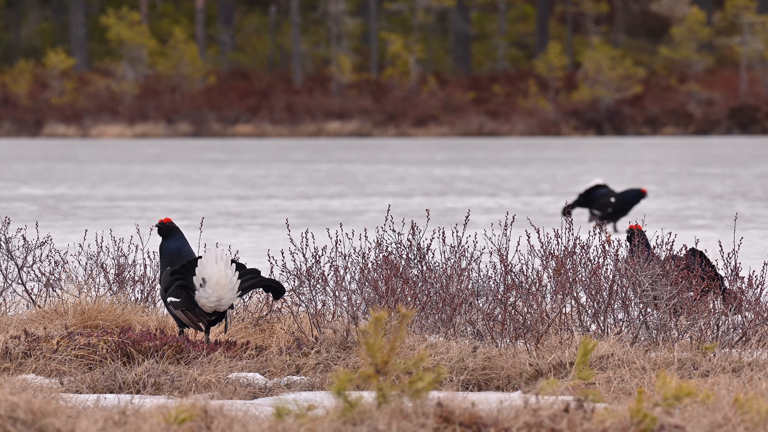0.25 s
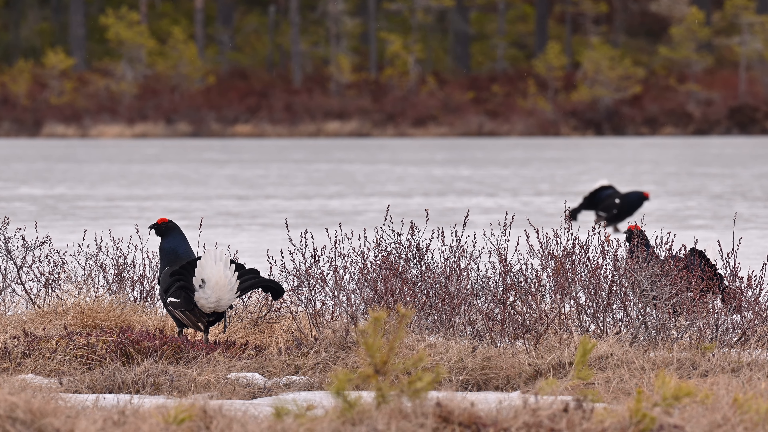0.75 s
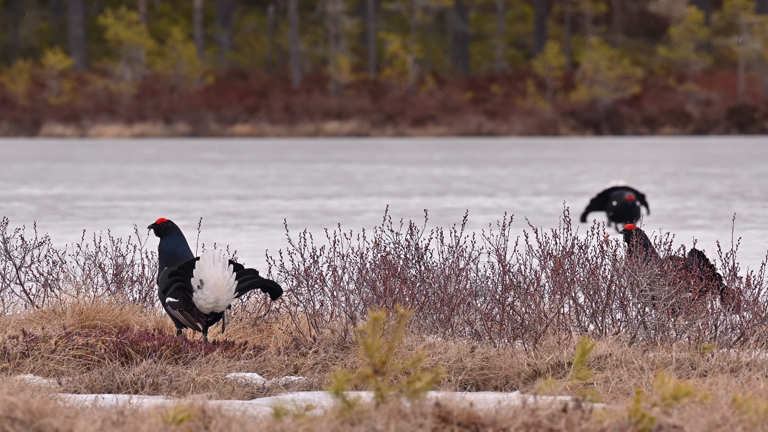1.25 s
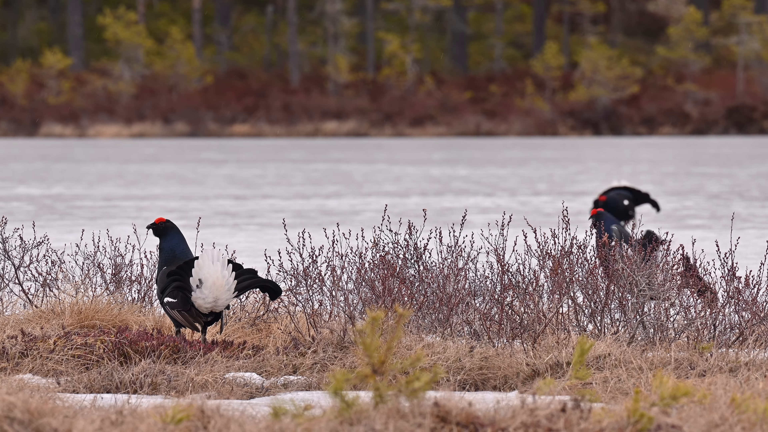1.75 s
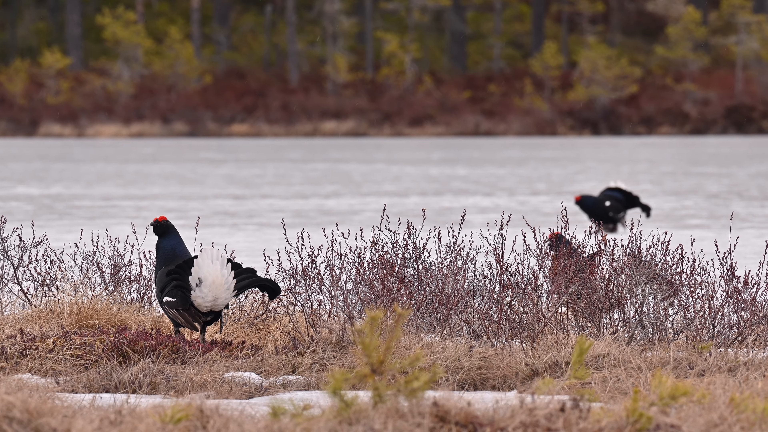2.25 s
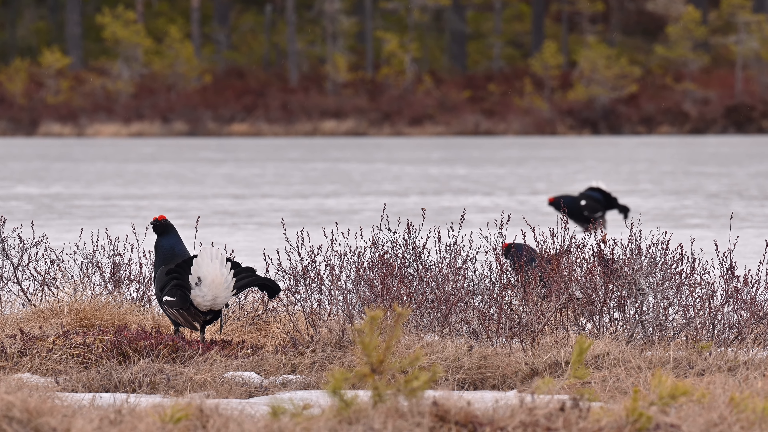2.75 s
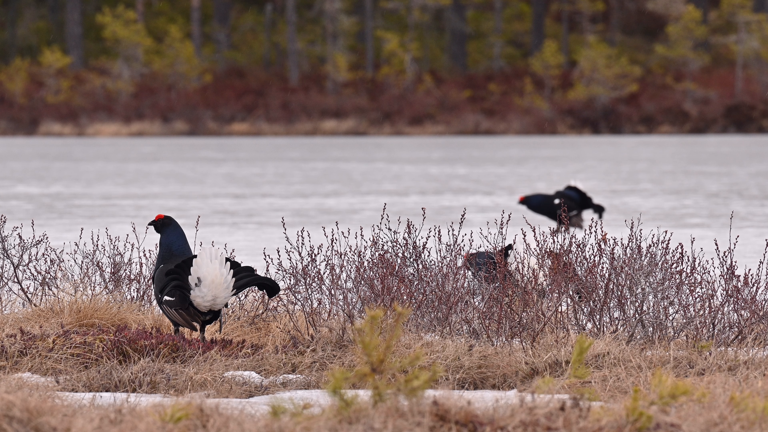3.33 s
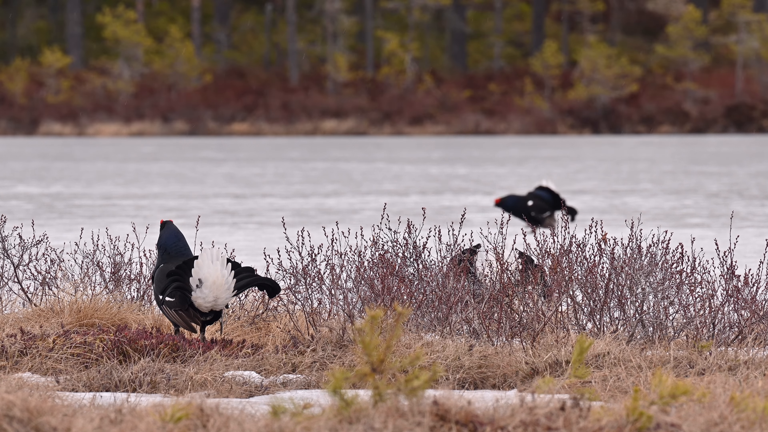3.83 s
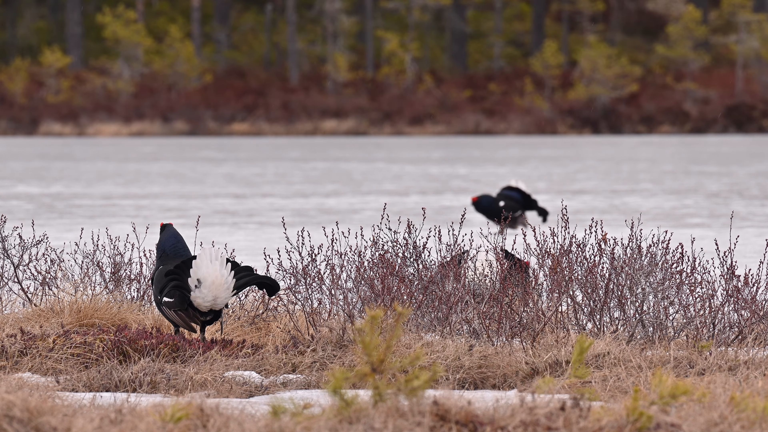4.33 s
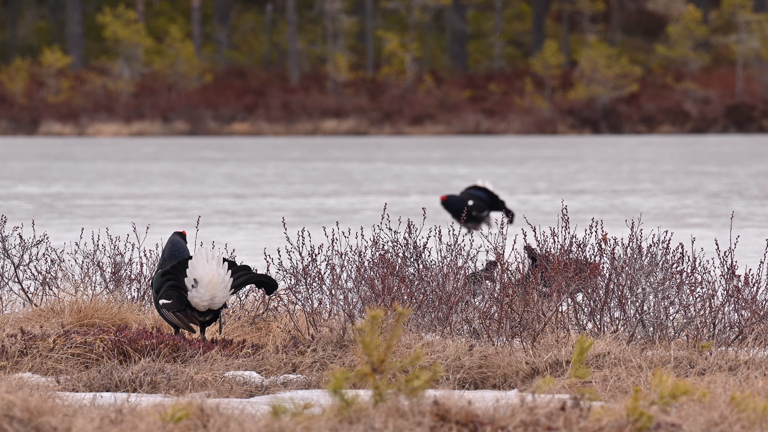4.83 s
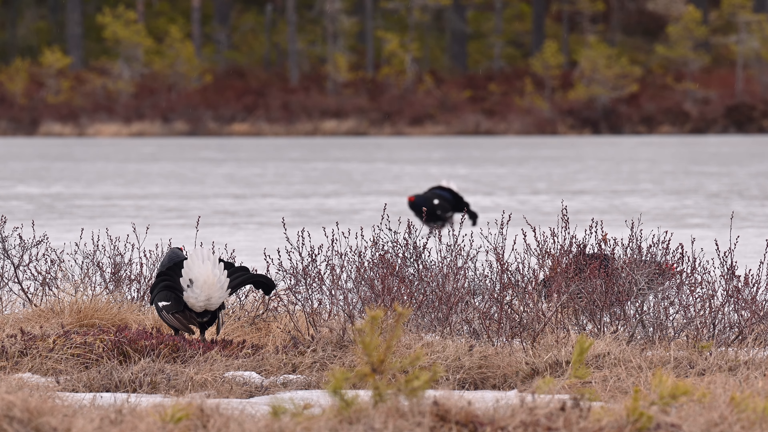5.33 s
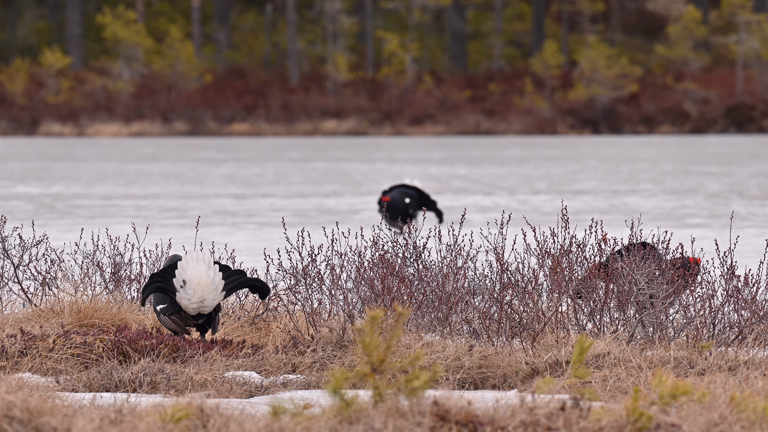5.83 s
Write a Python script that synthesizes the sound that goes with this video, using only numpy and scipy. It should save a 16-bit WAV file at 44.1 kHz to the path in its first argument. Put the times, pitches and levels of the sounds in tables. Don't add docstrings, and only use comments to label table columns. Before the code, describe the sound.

Black grouse cocks bubble in rolling, hollow coos on an open bog, with a brief opening hiss, a softer later hiss and faint distant bird whistles.

```python
import sys
import numpy as np
from scipy import signal
from scipy.fft import rfft, irfft
from scipy.io import wavfile

SR = 44100
rng = np.random.default_rng(int(sys.argv[2]) if len(sys.argv) > 2 else 0)


def to_wav(s):
    ch = np.atleast_2d(s).T
    pcm = np.round(np.clip(ch, -1, 1) * 32767)
    wavfile.write(sys.argv[1], SR, pcm.astype(np.int16))


def decibels_to_gain(level_db):
    exponent = np.asarray(level_db, float) / 20
    return 10 ** exponent


N = 267290

# frequency in Hz, density in dB per Hz.
AIR_SPECTRUM = [(15, -49), (25, -30.5), (165, 0), (333, 7), (424, 2.5), (707, 7.5), (1210, -4.5),
                (1310, -7), (2380, -4.5), (2950, -6.5), (3200, -8), (14100, -10), (15700, -12)]
AIR_DB = -68
# time in seconds, level in dB.
BREEZE_LEVEL = [(0, -78), (1.5, -73), (2.998, -75), (5.001, -72), (6.06, -67.5)]

# time in seconds, breath level in dB, windpipe and mouth resonances in Hz.
HISS_TRACKS = [
    [(0, -47.5, 2173, 5553), (.12, -49.5, 2190, 6000), (.15, -50, 2202, 7530), (.245, -52.5, 2150, 5860),
     (.265, -56, 1950, 5430), (.285, -60, 1850, 5530), (.31, -92, 1800, 5600)],
    [(1.79, -90, 1900, 6890), (1.82, -61.5, 2050, 6860), (1.85, -51.5, 2100, 6600), (1.89, -52, 2050, 7070),
     (1.92, -61, 1846, 6600), (2.03, -61, 1700, 5110), (2.15, -58, 1710, 5620), (2.36, -63.5, 2200, 3980),
     (2.41, -82, 2200, 3880)],
]
# frequency in Hz, density in dB per Hz.
BREATH_SPECTRA = [
    [(1400, -41), (1750, -3.5), (2650, 0.5), (3200, -13.5), (5500, -8), (6400, -8.5), (7600, -6),
     (8300, -10), (12000, -16.5), (15500, -26)],
    [(1200, -11), (1450, 3), (2500, 7), (3300, -4.5), (3800, -2.5), (5800, -8), (6400, -12), (7000, -10.5),
     (8200, -16.5), (11000, -30.5)],
]
# upper band in dB, fade in dB, fade time in seconds.
BILL_CLOSING = [
    (-2, 26.5, 0.034),
    (-2.5, 27.5, 0.076),
]
BAND_SPLIT_HZ = 4000
PIPE_WIDTH_HZ, PIPE_DB = 480, 2
MOUTH_WIDTH_HZ, MOUTH_DB = 1000, -3

NEAR_ECHO_S, NEAR_ECHO_DB = 0.1, -17
FOREST_T60_S, FOREST_DB, FOREST_BASS_DB = 3.4, -25, -36
FOREST_LOW_HZ, FOREST_CUT_HZ = 1110, 1570

SAC_HZ, SAC_WIDTH_HZ = 525.5, 97.4
RISE_S, FALL_S = 0.0074, 0.0041
PLUNGE_HZ, PLUNGE_S = 142, 0.004
SCOOP_HZ, SCOOP_S, STEEP_HZ = 88, 0.0061, 105
SWELL_DB, SWELL_FROM_HZ, SWELL_SPAN_HZ = 7.5, 518, 100
# length in seconds, start, middle and end pitch in Hz, level in dB.
ROLL_NOTES = [
    (.055, 454, 371, 360, -38),
    (.057, 490, 410, 409, -37.5),
    (.06, 527.7, 440, 404, -36),
    (.062, 551, 458, 408, -34),
    (.054, 580, 491, 430, -32),
    (.044, 526.3, 582, 470, -26.5),
    (.054, 550, 615, 442, -26.5),
    (.034, 615, 602, 490, -29),
]
ROLL_MARKS = (-3, 0, 6, 8, 9, 10, 11, 12)
PULSE_S = 0.068
# first and last note in seconds, gain in dB, pitch ratio.
WHOLE_ROLLS = [
    (0.469, 1.279, -0.4, 1.004),
    (2.932, 3.744, 0.34, 1.005),
    (3.619, 4.430, 4, 1.02),
]
# first and last note in seconds, first and last step, gain in dB.
BROKEN_ROLLS = [(.008, .211, 0, 2.5, -2), (1.551, 1.551, 1, 0, 8.5), (2.759, 2.895, -3.5, -3, 3.5),
                (2.859, 2.858, -2, 0, -1.5), (3.137, 3.207, 0.5, 1.5, 9.5), (3.346, 3.346, 0, -10, 5.5),
                (3.983, 3.983, 0, 4.5, 5), (5.325, 5.325, 0, 0.5, 5), (5.435, 5.706, 0, 5, 1.5),
                (5.746, 5.746, 8, 6, 6.5), (5.841, 5.981, 8.5, 8, 1), (5.959, 5.959, 9.5, 8.5, 0),
                (6.051, 6.051, 10, 9.5, 6)]
# first and last note in seconds, first and last step, gain in dB.
HIGH_ROLLS = [
    (4.409, 4.892, -0.5, 5, 3.5),
    (4.957, 5.228, 7, 8.5, 3),
    (5.298, 5.498, 8.5, 9.2, 4),
    (5.567, 5.705, 11, 11.3, 8.5),
    (5.768, 5.768, 11.7, 11.7, 7.5),
]
HIGH_RATIO = 1.045
# time into the verse and length in seconds, middle pitch and glide in Hz, level in dB.
VERSE_NOTES = [(0, .032, 616, -224, -36.5), (0.057, .07, 594.5, 23, -27), (0.193, .026, 606, -18.5, -25.5),
               (.3, .029, 508.3, 223, -31), (.329, .037, 565.5, -136, -27), (.391, .049, 503, -8, -29.5),
               (.461, .05, 552.3, 223.5, -29.5), (.503, .083, 590.6, 28.5, -32.5),
               (0.587, .026, 571, -130, -26), (.658, 0.027, 561, -117, -44), (0.702, .023, 532, -108, -35),
               (0.73, .04, 502.7, -30, -33.5), (0.78, .025, 560, 312.5, -28.5),
               (.808, .032, 577.5, -254, -27.5), (0.876, 0.019, 616, -124, -24.5),
               (.952, .054, 585, -9, -26), (1.027, 0.053, 566, 89, -26), (1.087, 0.02, 669, 116, -32),
               (1.109, 0.033, 564.6, -185, -26.5)]
# start in seconds, gain in dB, pitch ratio, time stretch.
VERSE_STARTS = [
    (1.497, 0, 1, 1),
    (3.978, .3, 1, 1),
    (4.619, 1.5, .99, 1.008),
]
# start and length in seconds, middle pitch and glide in Hz, level in dB.
LOOSE_NOTES = [(.278, 0.03, 463, -76, -38), (1.178, 0.011, 483, -60, -27.5), (3.652, 0.039, 428, 38.5, -30),
               (5.809, 0.017, 565, -170, -41.5), (6.028, 0.0309, 631, -100, -34),
               (1.492, 0.05, 398.4, 110, -34), (2.712, 0.037, 393, 81.5, -33),
               (2.799, 0.033, 510, -280, -34), (3.303, 0.023, 395, -25, -30),
               (3.937, 0.028, 467, -1.5, -32.5), (4.386, 0.014, 533, -93, -20)]
ARCH_HZ, ARCH_LOSS = 55, 0.24
HELD_S, HELD_ARCH_HZ = 0.076, 5

# start and length in seconds, start and end pitch in Hz, level in dB.
WHISTLES = [(2.49, .022, 2400, 2280, -71), (2.508, .025, 2368, 1920, -64), (2.53, .04, 1950, 1850, -74),
            (2.62, 0.068, 1990, 2330, -68.5), (2.884, 0.062, 2430, 2426, -69.5),
            (2.968, .034, 3020, 2320, -66.5), (3.055, 0.13, 2900, 2475, -69.5),
            (4.169, 0.071, 2888, 2950, -77), (4.24, 0.052, 2980, 3230, -77), (4.25, .11, 4830, 4430, -81.5),
            (4.69, .045, 2881, 2325, -69), (4.735, .047, 2330, 2726, -68), (4.78, 0.072, 2660, 2540, -64),
            (4.89, .04, 2820, 2660, -79.5), (4.985, 0.043, 2330, 2120, -69.5),
            (5.03, .04, 2276, 2140, -67.5), (5.07, .05, 2180, 2296, -71.5), (5.16, .05, 2680, 3002, -70),
            (5.377, .038, 3400, 4630, -74.5), (5.422, .03, 3320, 3580, -67.5),
            (5.45, .024, 3640, 2850, -70.5), (3.577, .032, 3400, 4970, -70), (3.607, .026, 4900, 4560, -83),
            (5.66, 0.035, 3280, 3129, -79.5)]
# start in seconds, start and end pitch in Hz, level in dB.
CHIPS = [(3.006, 2250, 2900, -65), (3.196, 2170, 1820, -71), (5.409, 2850, 3380, -70),
         (4.384, 4950, 3550, -73), (4.499, 4950, 3605, -74.5), (4.862, 4870, 3940, -74.5),
         (4.872, 2400, 3050, -63.5), (5.077, 3400, 3950, -63), (5.105, 2280, 2850, -67.5),
         (5.13, 2800, 2790, -66), (5.166, 3150, 3990, -67.5), (5.206, 2950, 2324, -65.5),
         (5.265, 3300, 3834, -64.5), (5.288, 2820, 2845, -70.5), (5.404, 3400, 4580, -67.5),
         (5.424, 4600, 4640, -73.5)]
CHIP_S = 0.016
WHISTLE_ECHO_S, WHISTLE_ECHO_DB = 0.3, -5

# time in seconds, thud in dB, crackle over thud in dB.
FOOTFALLS = [
    (3.369, -58.5, 1.5),
    (3.471, -56.5, -3),
    (3.861, -59.5, -8.5),
    (5.733, -76, -6.5),
]


def rms_one(x):
    return x / np.sqrt(np.mean(x ** 2) + 1e-20)


def band(x, low_hz, high_hz, order=2):
    return signal.sosfilt(signal.butter(order, [low_hz, high_hz], "band", fs=SR, output="sos"), x)


def coloured_noise(spectrum):
    hz = np.maximum(np.arange(N // 2 + 1) * SR / N, 1)
    points_hz, points_db = np.transpose(spectrum)
    density_db = np.interp(np.log(hz), np.log(points_hz), points_db)
    return rms_one(irfft(rfft(rng.standard_normal(N)) * decibels_to_gain(density_db), N))


def noise_on(centre_hz, width_hz):
    lowpass = signal.butter(2, width_hz / 2, fs=SR, output="sos")
    narrow = signal.sosfilt(lowpass, rng.standard_normal((2, N)))
    phase = 2 * np.pi * np.cumsum(centre_hz) / SR
    return rms_one(narrow[0] * np.cos(phase) + narrow[1] * np.sin(phase))


def resonance(x, hz, width_hz):
    r = np.exp(-np.pi * width_hz / SR)
    poles = [1, -2 * r * np.cos(2 * np.pi * hz / SR), r * r]
    return signal.lfilter([(1 - r * r) / 2, 0, (r * r - 1) / 2], poles, x)


def glides(notes, rise_s, fall_s, plunge_hz, swell_db, scoop_hz=0):
    out = np.zeros(N + SR)
    for (start, length, begin_hz, middle_hz, end_hz, db), turn in zip(notes, rng.random(len(notes))):
        t = np.arange(round(length * SR)) / SR
        u = t / length
        hz = begin_hz * (1 - u) * (1 - 2 * u) + 4 * middle_hz * u * (1 - u) + end_hz * u * (2 * u - 1)
        hz = hz - plunge_hz * np.exp((t - length) / PLUNGE_S)
        if abs(end_hz - begin_hz) < STEEP_HZ:
            hz = hz - scoop_hz * np.exp(-t / SCOOP_S)
        ramp = np.clip(np.minimum(t / rise_s, (length - t) / fall_s), 0, 1)
        edge = np.sin(np.pi / 2 * ramp) ** 2
        strain = np.clip((middle_hz - SWELL_FROM_HZ) / SWELL_SPAN_HZ, 0, 1)
        level = decibels_to_gain(db + swell_db * strain * (u - 1))
        first = max(round(start * SR), 0)
        out[first:first + len(t)] += level * edge * np.sin(2 * np.pi * (turn + np.cumsum(hz) / SR))
    return out[:N]


def background():
    s, db = np.transpose(BREEZE_LEVEL)
    breeze_gain = decibels_to_gain(np.interp(np.arange(N) / SR, s, db) + 1)
    breeze = breeze_gain * rms_one(band(rng.standard_normal(N), 90, 360))
    far_lek = decibels_to_gain(-76.5) * rms_one(band(rng.standard_normal(N), 743, 800))
    return decibels_to_gain(AIR_DB) * coloured_noise(AIR_SPECTRUM) + breeze + far_lek


def hisses():
    out, t = np.zeros(N), np.arange(N) / SR
    for track, spectrum, (upper_db, fade_db, fade_s) in zip(HISS_TRACKS, BREATH_SPECTRA, BILL_CLOSING):
        s, *columns = np.transpose(track)
        low_db, pipe_hz, mouth_hz = (np.interp(t, s, column) for column in columns)
        high_db = low_db + upper_db - fade_db * np.exp(np.minimum(t - s[-1], 0) / fade_s)
        breath = coloured_noise(spectrum)
        low = rms_one(band(breath, 900, BAND_SPLIT_HZ, order=4))
        high = rms_one(band(breath, BAND_SPLIT_HZ, 16000, order=4))
        low = rms_one(low + decibels_to_gain(PIPE_DB) * noise_on(pipe_hz, PIPE_WIDTH_HZ))
        high = rms_one(high + decibels_to_gain(MOUTH_DB) * noise_on(mouth_hz, MOUTH_WIDTH_HZ))
        ragged = decibels_to_gain(0.85 * rms_one(band(rng.standard_normal(N), 3.7, 27)))
        sounding = (t >= s[0]) * (t < s[-1])
        out += sounding * ragged * (decibels_to_gain(low_db) * low + decibels_to_gain(high_db) * high)
    return out


def echoes(x):
    t = np.arange(2 * SR) / SR
    near, far = rng.standard_normal((2, 2 * SR))
    near = near * decibels_to_gain(-60 * t / NEAR_ECHO_S) * (t > 0.004)
    far = far * decibels_to_gain(-60 * t / FOREST_T60_S) * np.clip(t / 1.1, 0, 1)
    mids = band(far, FOREST_LOW_HZ, FOREST_CUT_HZ)
    bass = band(far, 210, 800)
    tail = np.zeros(2 * SR)
    for db, part in ((NEAR_ECHO_DB, near), (FOREST_DB, mids), (FOREST_BASS_DB, bass)):
        tail += decibels_to_gain(db) * part / np.linalg.norm(part)
    return signal.fftconvolve(x, tail)[:N]


def roll_notes():
    rolls = [(start, end, 0, 12, db, ratio) for start, end, db, ratio in WHOLE_ROLLS]
    rolls += [(*roll, 1) for roll in BROKEN_ROLLS]
    rolls += [(*roll, HIGH_RATIO) for roll in HIGH_ROLLS]
    notes = []
    for start, end, first, last, gain_db, ratio in rolls:
        count = round((end - start) / PULSE_S) + 1
        for s, step in zip(np.linspace(start, end, count), np.linspace(first, last, count)):
            length, *hz, db = (np.interp(step, ROLL_MARKS, column) for column in np.transpose(ROLL_NOTES))
            notes.append((s, length, *(ratio * np.array(hz)), db + gain_db))
    return notes


def arched_notes():
    rows = []
    for start, gain_db, ratio, stretch in VERSE_STARTS:
        for s, length, hz, glide_hz, db in VERSE_NOTES:
            rows.append((start + stretch * s, length, ratio * hz, glide_hz, db + gain_db))
    notes = []
    for s, length, hz, glide_hz, db in rows + LOOSE_NOTES:
        droop_hz = ARCH_HZ - ARCH_LOSS * abs(glide_hz) if length < HELD_S else HELD_ARCH_HZ
        ends_hz = hz - droop_hz
        notes.append((s, length, ends_hz - glide_hz / 2, hz, ends_hz + glide_hz / 2, db))
    return notes


def bubbling():
    rolls = glides(roll_notes(), RISE_S, FALL_S, PLUNGE_HZ, SWELL_DB)
    verses = glides(arched_notes(), RISE_S, FALL_S, PLUNGE_HZ, SWELL_DB, SCOOP_HZ)
    return resonance(rolls + verses, SAC_HZ, SAC_WIDTH_HZ)


def song_notes():
    rows = WHISTLES + [(s, CHIP_S, a, b, db) for s, a, b, db in CHIPS]
    return [(s, length, a, (a + b) / 2, b, db) for s, length, a, b, db in rows]


def songbirds():
    flutter = decibels_to_gain(2.5 * rms_one(band(rng.standard_normal(N), 15, 120)))
    direct = flutter * glides(song_notes(), rise_s=0.0018, fall_s=0.0037, plunge_hz=0, swell_db=0)
    t = np.arange(SR // 2) / SR
    scatter = rng.standard_normal(len(t)) * decibels_to_gain(-60 * t / WHISTLE_ECHO_S)
    tail = signal.fftconvolve(direct, scatter / np.linalg.norm(scatter))[:N]
    return direct + decibels_to_gain(WHISTLE_ECHO_DB) * tail


def footsteps():
    out, t = np.zeros(N + SR), np.arange(SR // 10) / SR
    for s, thud_db, crackle_db in FOOTFALLS:
        thud = np.sin(2 * np.pi * 110 * t) * np.exp(-t / 0.012)
        grit = band(rng.standard_normal(len(t)), 900, 4000)
        crackle = decibels_to_gain(crackle_db) * grit * np.exp(-t / 0.004)
        first = round(s * SR)
        out[first:first + len(t)] += decibels_to_gain(thud_db) * (thud + crackle)
    return out[:N]


def scene():
    birds = bubbling() + songbirds() + hisses() + footsteps()
    return (birds + echoes(birds) + background())[None]


def band_limit(x):
    return signal.sosfilt(signal.butter(12, 15870, fs=SR, output="sos"), x)


def record(dry):
    return band_limit(dry)


dry = scene()
out = record(dry)
to_wav(out)
```